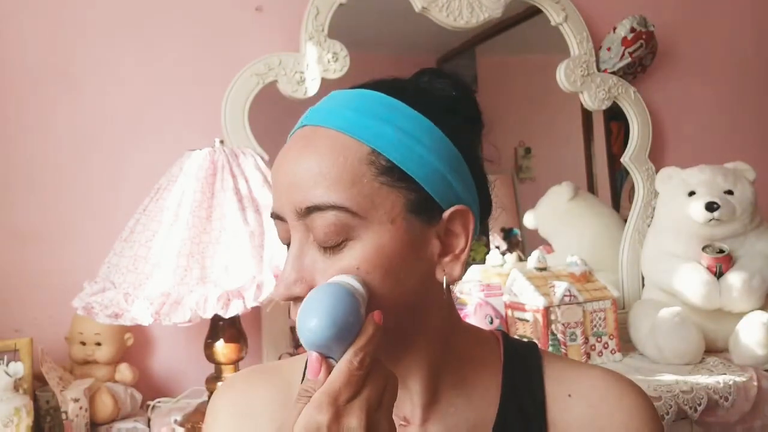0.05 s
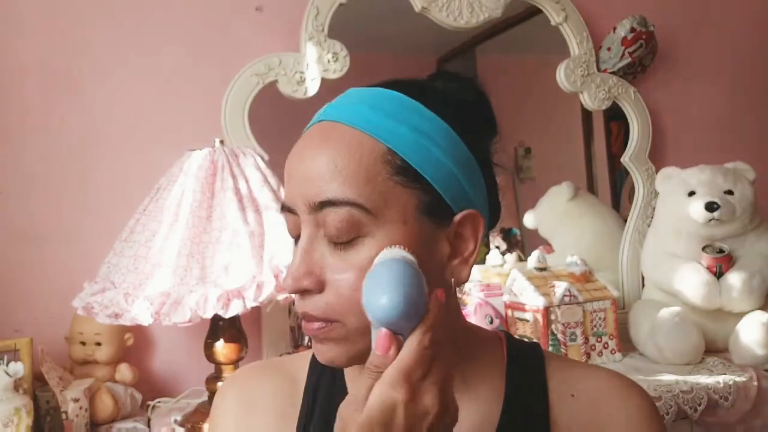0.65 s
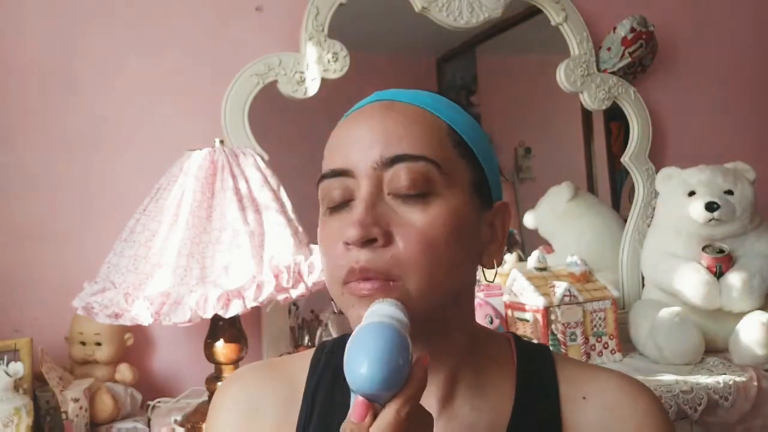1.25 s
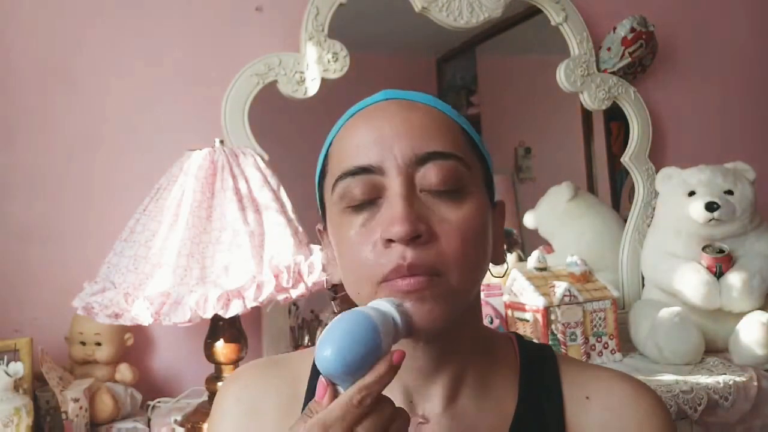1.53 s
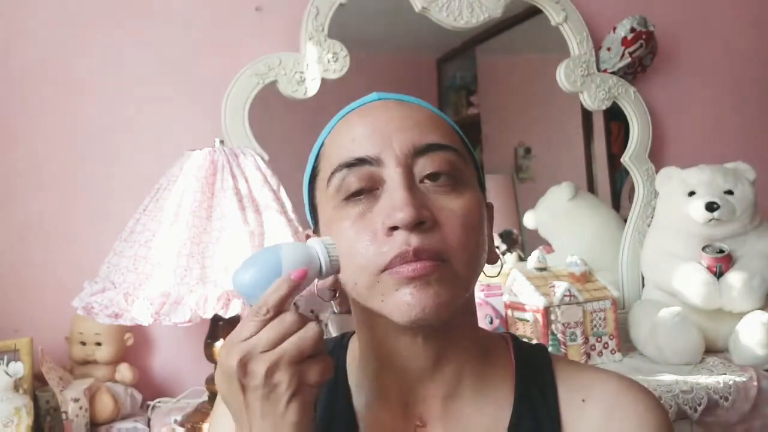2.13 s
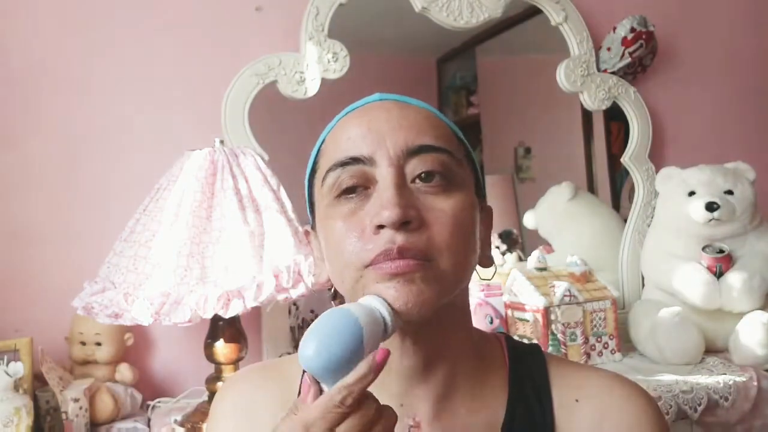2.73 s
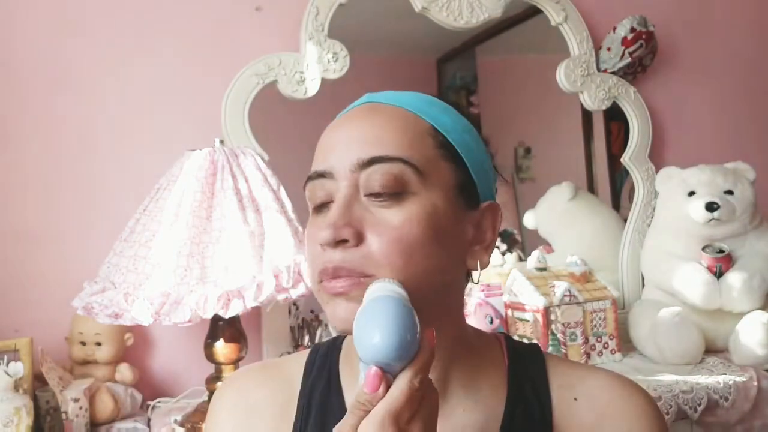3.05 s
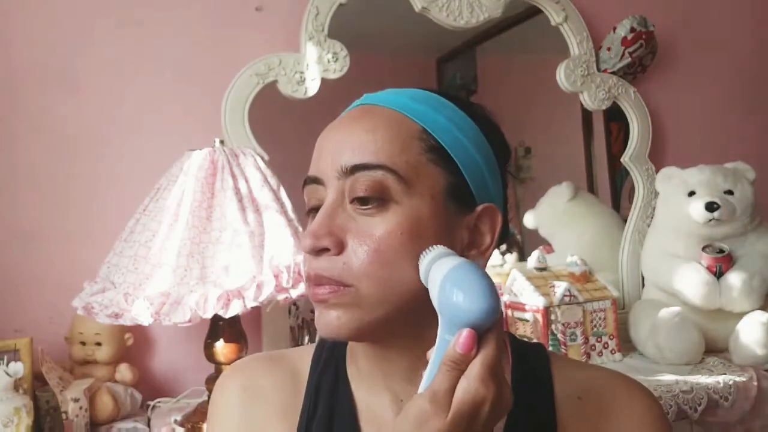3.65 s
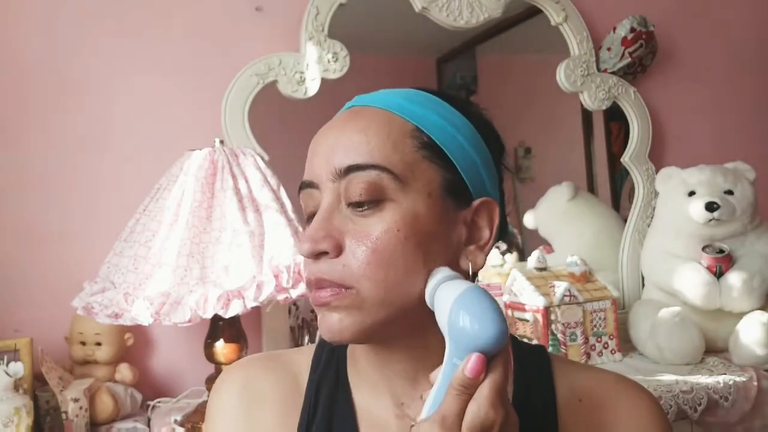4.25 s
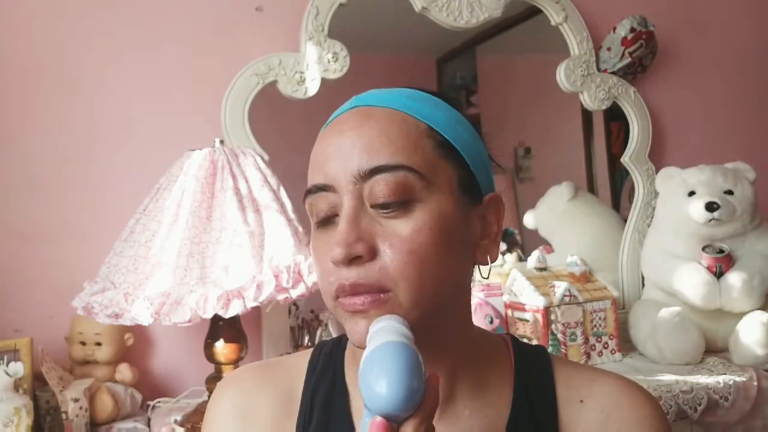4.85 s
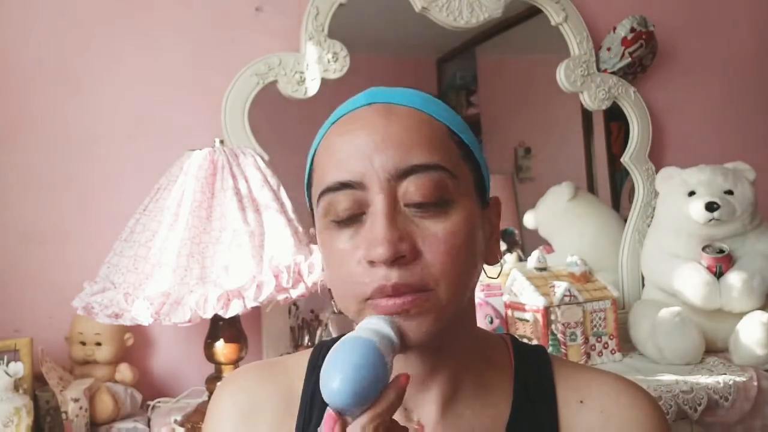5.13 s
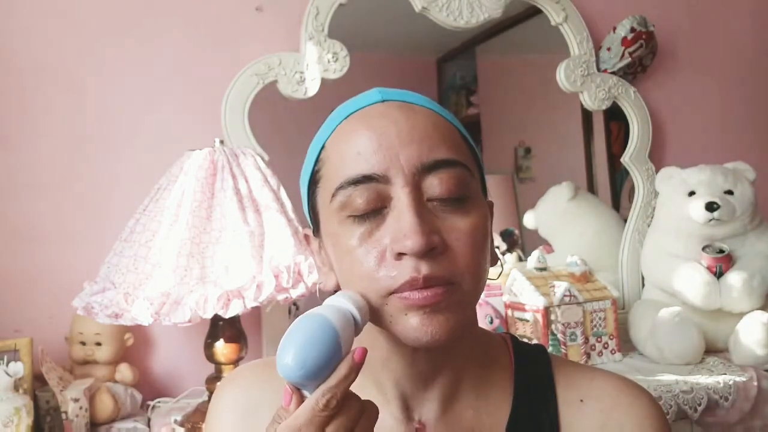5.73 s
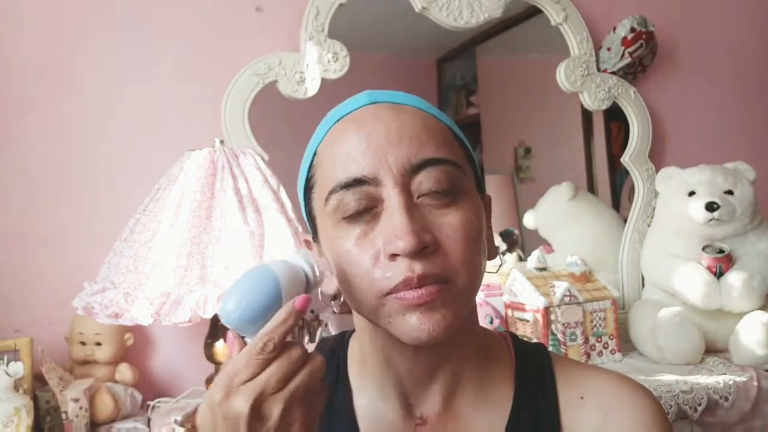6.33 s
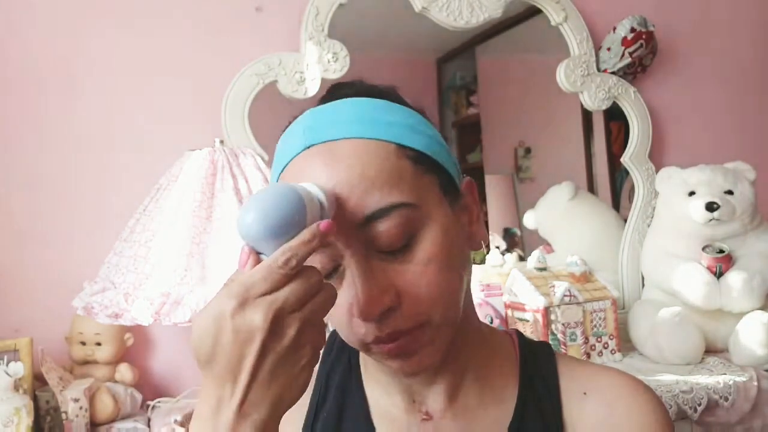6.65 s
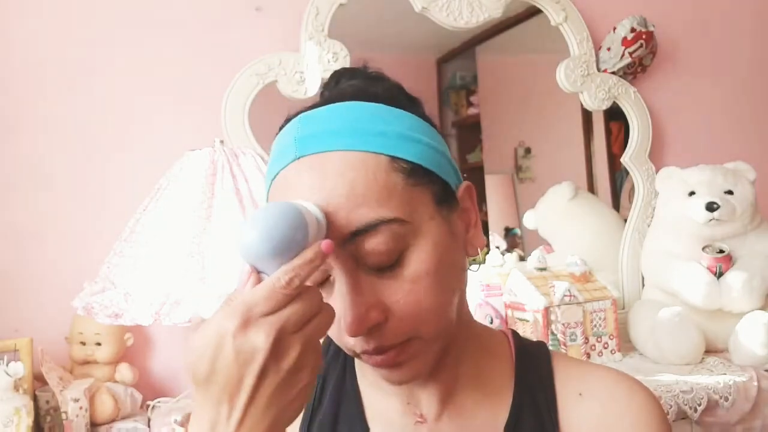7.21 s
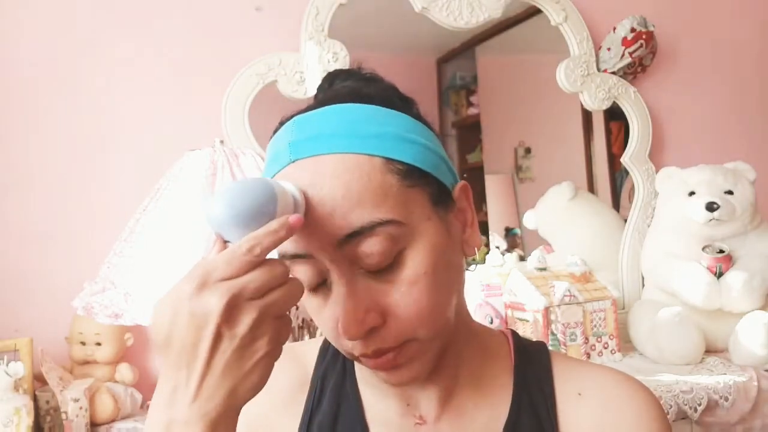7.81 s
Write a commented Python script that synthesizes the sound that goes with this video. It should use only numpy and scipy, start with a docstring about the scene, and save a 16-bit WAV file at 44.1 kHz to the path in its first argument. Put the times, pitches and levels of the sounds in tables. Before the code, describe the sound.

A small battery facial brush buzzes close to the microphone for the whole eight seconds, in a quiet bedroom with a very faint low rumble. The sound is a bright, raspy rattle of plastic gears in a hollow shell, with a whine on top and a soft, dull rub of bristles on skin underneath. Loudness stays fairly even, but the pitch keeps wavering, sinking and softening under pressure, then rising again. It dips deepest around 3.3, 3.6, 5.3, 6.2 and 7.1 seconds and peaks near 1.1, 2.5, 5.8 and 6.7 seconds. Light, short bristle scrapes come at about 0.3, 1.5, 2.6, 3.1, 5.9 and 7.3 seconds. The gears squeal briefly here and there, most clearly between 1 and 1.5 seconds and from 6 to 6.8 seconds. At the end the motor sags to its lowest pitch, still running.

```python
"""A battery facial brush runs against the skin in a small bedroom, close to the microphone.
Its plastic gear teeth meet several hundred times a second: the impacts excite the resonances of the
hollow shell, and harmonics of the mesh rate sound as a whine. Pressing harder loads the motor, so
the whine sinks and the rasp softens. The bristles rub and now and then scrape, binding gears squeal
briefly, and a faint room rumble lies underneath."""
import sys
import numpy as np
from scipy import signal
from scipy.fft import rfft, irfft, next_fast_len
from scipy.io import wavfile
from scipy.ndimage import uniform_filter1d

SR = 44100
rng = np.random.default_rng(int(sys.argv[2]) if len(sys.argv) > 2 else 0)


def generate_wav(signal):
    """Clip the signal to [-1, 1] and save it as 16-bit WAV at the path in sys.argv[1]."""
    frames = np.transpose(np.atleast_2d(signal))
    scaled = np.clip(frames, -1, 1) * 32767
    pcm = np.round(scaled).astype(np.int16)
    wavfile.write(sys.argv[1], SR, pcm)


N = 351918

# Motor speed, sagging with each press on the skin. Each row: time in seconds, mesh rate in Hz.
MESH_RATE = [(0.0, 736.0), (0.2, 830), (0.29, 750), (0.44, 787), (0.52, 664), (0.61, 587.0), (0.75, 835),
             (0.85, 670), (0.95, 617), (1.15, 1020), (1.23, 860), (1.44, 960), (1.55, 880), (1.69, 658),
             (1.91, 840), (2.06, 720), (2.21, 835), (2.36, 634), (2.53, 1080), (2.64, 730), (2.82, 840),
             (3.0, 915), (3.25, 528), (3.41, 737), (3.52, 645), (3.64, 468), (3.89, 866), (4.04, 656),
             (4.24, 824), (4.31, 743), (4.47, 724), (4.53, 856), (4.63, 660), (4.81, 840), (4.97, 750),
             (5.05, 886), (5.27, 520), (5.46, 559.0), (5.66, 896), (5.82, 1120), (5.93, 742.0), (6.03, 633),
             (6.19, 523), (6.43, 1130), (6.57, 970), (6.68, 1260), (6.73, 969.0), (6.85, 970),
             (7.07, 510.0), (7.23, 950), (7.4, 694), (7.51, 660), (7.59, 826), (7.78, 699.0), (7.87, 575),
             (7.98, 430)]
# Errors of the gear wheel. Each row: multiple of its turning rate, modulation depth in dB.
WHEEL_RUNOUT = [(1, -1.26), (3, 0.83), (5, -0.45), (7, 1.3), (9, .5)]
# Rough upper buzz of the gears. Each row: multiple of the mesh rate, relative level in dB.
BUZZ_HARMONICS = [(4, 6), (5, 5.5), (6, 6), (7, 5.5), (8, 4), (9, 4), (10, -2.5), (11, 1), (12, -2),
                  (13, -7.5)]
# Broad response of the shell. Each row: frequency in Hz, gain in dB.
SHELL_RESPONSE = [(150, -28), (350, -25), (700, -20.5), (1000, -14), (1300, -11), (1600, -6), (2100, -2.5),
                  (2800, -1), (3700, 3), (5200, 7), (7700, 3), (10800, -8.5), (12800, -9), (15000, -17)]
# Narrow resonances on that response. Each row: frequency in Hz, width in Hz, lift in dB.
SHELL_PEAKS = [(2020, 70, 2), (2205, 90, 4.5), (2375, 100, 4.5), (3030, 70, 2), (3640, 60, 2.5),
               (3830, 100, 3), (4490, 130, 3), (5560, 200, 2.2), (6140, 110, 2.8), (6780, 60, 2),
               (7020, 120, 2), (9250, 350, 3), (10100, 160, 3), (11850, 600, 2.5)]
# Loudness rises with speed, then levels off while the top keeps growing.
# Each row: mesh rate in Hz, then base levels of growl, rasp and sizzle in dB.
LEVELS_BY_SPEED = [(490, -56.5, -52.5, -63.5), (581, -53, -49.5, -56.5), (692, -54, -45, -51),
                   (823, -52, -43, -47), (1150, -53.5, -42.5, -44.5)]
# The brush is louder or softer as it is moved and turned. Each row: time in seconds, gain in dB.
TURNING_GAIN = [(0.0, 1.2), (0.54, 0.7), (0.72, -0.7), (0.9, 1.9), (1.02, 0), (1.5, 0.6), (1.74, -0.5),
                (1.98, 0.5), (2.52, -0.7), (2.88, 0.26), (3.78, 0), (5.94, -0.04), (6.36, -1.3), (6.72, 0),
                (7.08, 0.7), (7.2, -2), (7.26, 0.4), (7.98, -2)]
# Clear gear tones. Each entry: relative level in dB, for harmonics 1 to 5 of the mesh rate.
WHINE_HARMONICS_DB = [-1.5, -0.5, -4, -10, -6]
# The shell's response to a gliding tone. Each row: frequency in Hz, base level in dB over the rasp.
WHINE_RESPONSE = [(470, -30), (740, -35.5), (850, -26), (950, -24.5), (1050, -23.5), (1300, -16.5),
                  (1600, -16), (1750, -13), (1950, -7), (2250, -4), (2450, -9.5), (2800, -10.5),
                  (3250, -7.5), (3550, -29), (5000, -22)]
# Slow swings of the two main tones. Each row: time in seconds, gains of harmonics 2 and 3 in dB.
WHINE_SWINGS = [(0, 2, 4), (.25, 2, -3), (.8, 2, -1.5), (1.15, -1.5, 2), (1.7, -5, 1), (2.4, -6, 3),
                (2.7, -1.5, 1.5), (3.3, 1, -1), (3.7, -3.5, 3.5), (4.05, 3, 3), (4.62, 2, 2.5),
                (5.05, -1.5, 6), (5.3, -3, -2.5), (5.95, -2.5, 5), (6.45, -0.5, -2), (6.9, -2.5, -2),
                (7.45, 0.5, 1), (7.98, -2, 0.5)]
# How freely the hand lets the shell ring.
# Each row: time in seconds, then base levels of the low, middle and high modes in dB over the rasp.
GRIP_LEVELS = [(0.0, -25, -12, -15), (0.18, -5.5, -6.5, -13.9), (0.3, -18, -9, -12),
               (0.96, -5.5, -7.5, -23), (1.38, -11, -11, -16), (1.92, -7.5, -11, -17), (1.98, -10, -7, -26),
               (2.64, -7.5, -11, -15), (3.24, -7.5, -7.5, -21), (3.6, -7, -10, -16), (4.08, -9, -12.8, -22),
               (4.86, -5, -9, -18), (5.34, -10, -14, -14), (6.36, -8.5, -10, -24.5),
               (6.84, -12.5, -16, -10), (7.02, -16, -16.2, -16.7), (7.2, -11, -13.2, -10),
               (7.98, -11, -15.4, -19)]
# Dull rub of bristles on skin. Each row: frequency in Hz, relative spectral level in dB.
RUB_SPECTRUM = [(30, -1), (70, 0.5), (150, 2), (300, -1), (600, 2.5), (1000, -2.5), (2000, -27),
                (6000, -39)]
# Room background. Each row: frequency in Hz, relative spectral level in dB.
ROOM_SPECTRUM = [(20, -8), (40, 1), (65, 4), (90, 4.5), (118, 9.5), (160, 2.5), (220, -6.5), (400, -2.5),
                 (700, -4.5), (1500, -53), (5000, -49), (15000, -27)]
# Dragging bristles. Each row: centre and length in seconds, frequency in Hz, peak in dB over the rasp.
BRISTLE_SCRAPES = [(.3, 0.43, 5400, -9), (1.495, 0.15, 6100, -5), (1.982, 0.082, 4750, -9),
                   (2.59, .07, 3840, -5.5), (3.122, .13, 4470, -6), (4.296, 0.15, 4350, -11),
                   (5.865, 0.068, 3907, -3), (5.869, 0.064, 6010, -6), (6.061, 0.21, 4560, -9),
                   (6.289, 0.042, 3070, -6), (6.721, .07, 5900, -8), (6.92, .08, 4400, -10),
                   (7.34, .11, 4358, -8)]
# Binding gears. Each row: centre and length in seconds, multiple of the mesh rate, lift in dB.
GEAR_SQUEALS = [(0.29, 0.076, 3, 10.5), (0.946, .1, 2, 6), (1.125, 0.14, 1, 14), (1.39, .15, 1, 11.5),
                (1.62, 0.073, 3, 8), (1.825, .08, 3, 7.5), (2.499, .15, 1, 11.5), (2.67, 0.11, 3, 5.5),
                (3.922, 0.12, 2, 4.5), (3.971, 0.047, 3, 1.5), (4.271, 0.19, 2, 2), (4.37, .16, 3, 5.5),
                (5.11, 0.082, 3, 5.5), (5.36, 0.34, 4, 6), (5.42, 0.19, 5, 7), (6.09, .2, 4, 15.5),
                (6.113, 0.12, 5, 12.5), (6.471, .14, 1, 13), (6.661, 0.14, 1, 19), (6.783, .15, 2, 8)]
# The sound leans slightly left near 2 kHz and slightly right near 9.5 kHz.
# Each row: frequency in Hz, width in Hz, share added on the left and taken from the right.
STEREO_TILT_BANDS = [(1980, 280, 0.31), (9500, 440, -0.31)]


def from_db(db):
    """Amplitude ratio: a factor of ten for every 20 dB."""
    return 10 ** (np.asarray(db) / 20)


def unit_rms(x):
    """Normalisation to a mean power of one."""
    return x / np.sqrt(np.mean(x ** 2) + 1e-20)


def levelled(x):
    """Division by the running RMS holds the short-term power near one."""
    power = uniform_filter1d(uniform_filter1d(x * x, size=2200), size=2200)
    return x / np.sqrt(power + 1e-20)


def in_time(rows):
    """Linear interpolation in time gives each column one value per sample."""
    times, *columns = np.transpose(rows)
    return [np.interp(np.arange(N) / SR, times, column) for column in columns]


def at_hz(rows, hz):
    """Interpolation of each column on a logarithmic frequency axis."""
    freqs, *columns = np.transpose(rows)
    return [np.interp(np.log(np.maximum(hz, 1)), np.log(freqs), column) for column in columns]


def drift(rate_hz):
    """Low-passed noise gives a smooth random fluctuation with a spread of about one."""
    pole = np.exp(-2 * np.pi * rate_hz * 20 / SR)
    noise = rng.standard_normal((N + SR) // 20 + 2)  # one draw per 20 samples
    slow = signal.lfilter([1], [1, -2 * pole, pole * pole], noise)[SR // 20:]
    return np.interp(np.arange(N) / 20, np.arange(len(slow)), unit_rms(slow))


def swell(centre_s, length_s):
    """A Gaussian envelope of height one, its length taken between the 1/e points."""
    return np.exp(-np.minimum((2 * (np.arange(N) / SR - centre_s) / length_s) ** 2, 20))


def coloured(x, spectrum, peaks=()):
    """Spectral shaping by a broad response with bell-shaped resonant lifts."""
    size = next_fast_len(N + SR // 10)
    hz = np.arange(size // 2 + 1) * SR / size
    lift_db = sum(db / (1 + (2 * (hz - centre) / width) ** 2) for centre, width, db in peaks)
    return irfft(rfft(x, size) * from_db(at_hz(spectrum, hz)[0] + lift_db), size)[:N]


def split(x, hz):
    """A complementary crossover: the parts below and above a frequency sum to the whole."""
    low = signal.sosfiltfilt(signal.butter(5, hz, "low", fs=SR, output="sos"), x)
    return low, x - low


def resonance(x, hz, width_hz):
    """Forced vibration of two damped resonators in series, each of the given bandwidth."""
    radius = np.exp(-np.pi * width_hz / SR)
    poles = [1, -2 * radius * np.cos(2 * np.pi * hz / SR), radius * radius]
    once = signal.lfilter([1, 0, -1], poles, x)
    return signal.lfilter([1, 0, -1], poles, once)


def motor(inertia_s=.05, usual_hz=780, braking_octaves_per_s=6.4):
    """Rotor inertia rounds each change of speed; drag runs from -1 (racing up) to 1 (braked by skin)."""
    mesh_hz = uniform_filter1d(in_time(MESH_RATE)[0], size=int(inertia_s * SR), mode="nearest")
    octaves = np.log2(mesh_hz / usual_hz)
    drag = np.tanh(-np.gradient(octaves) * SR / braking_octaves_per_s)
    return mesh_hz, octaves, drag


def runout(teeth, wheel_teeth=54):
    """Amplitude modulation: a wheel out of true bites harder at the same places on each turn."""
    turns = teeth / wheel_teeth
    bite_db = sum(db * np.sin(2 * np.pi * (k * turns + rng.random())) for k, db in WHEEL_RUNOUT)
    return from_db(bite_db + 0.16 * drift(48))


def tooth_clicks(teeth, jitter_s=.00004, uneven_db=1.0, slide_db=8, slide_decay_teeth=.85):
    """Impact and sliding friction: each tooth lands early or late, on either flank, then scrapes."""
    contacts = np.flatnonzero(np.diff(np.floor(teeth)) > 0)
    late, force, flank = rng.standard_normal((len(contacts), 3)).T
    landings = np.clip(contacts + jitter_s * SR * late, 0, N - 2).astype(int)
    strength = from_db(uneven_db * np.clip(force, -2, 2))
    clicks = np.bincount(landings, strength * np.sign(flank), N)
    last_tooth = np.maximum(np.searchsorted(contacts, np.arange(N)) - 1, 0)
    sliding = np.exp(-(teeth % 1) / slide_decay_teeth) * strength[last_tooth] * rng.standard_normal(N)
    return unit_rms(unit_rms(clicks) + from_db(slide_db) * unit_rms(sliding))


def bristle_flicks(per_s=5000, spread_db=2.8):
    """Stick-slip friction: bristle tips catch on the skin and flick free as random impulses."""
    flicks = (rng.random(N) < per_s / SR) * rng.choice([-1, 1], N)
    strength = from_db(spread_db * np.minimum(rng.exponential(1, N), 4))
    return unit_rms(flicks * strength)


def face_reflections(x, lag_s=.0017, sway=.12, share=.2):
    """Comb filtering: echoes from cheek and hand shift in delay as the brush moves."""
    n = np.arange(N)
    lags = [k * lag_s * SR * (1 + sway * drift(0.464)) for k in (1, 1.7, 2.9)]
    return x + share * sum(np.interp(n - lag, n, x) for lag in lags)


def bedroom(x, t60_s, wet_db):
    """Reverberation: direct sound plus a diffuse tail whose paths change as brush and head move."""
    t = np.arange(SR // 4) / SR
    tails = rng.standard_normal((6, len(t))) * from_db(-60 * t / t60_s) * (t > .002)
    weights = np.array([drift(1.07) for _ in tails])
    weights = weights / np.linalg.norm(weights, axis=0)
    echoes = [signal.oaconvolve(x, tail / np.linalg.norm(tail))[:N] for tail in tails]
    return x + from_db(wet_db) * np.sum(weights * echoes, axis=0)


def gear_buzz(teeth, swell_db=2.2, slip_rad=.5):
    """Phase modulation: play in the gears blurs the upper harmonics of the mesh rate."""
    loose_teeth = teeth + .075 * drift(34)
    buzz = 0
    for k, db in BUZZ_HARMONICS:
        gain = from_db(db + swell_db * drift(12))
        path_cycles = .5 * rng.random()  # the gear train delays each harmonic differently
        buzz += gain * np.sin(2 * np.pi * (k * loose_teeth + path_cycles) + slip_rad * drift(80))
    return unit_rms(buzz)


def shell_radiation(shake, mesh_hz, growl_db, rasp_db, sizzle_db):
    """Source and filter: the shaken shell radiates a low growl, a middle rasp and a high sizzle."""
    low, high = split(coloured(shake, SHELL_RESPONSE, SHELL_PEAKS), 2850)
    bass, low_middle = split(low, 1600)
    middle, top = split(high, 8830)
    labour = np.clip(1 - mesh_hz / 700, 0, 1)  # a labouring motor loses the bottom of its growl
    growl = from_db(growl_db + 0.3 * drift(2.5)) * levelled(low_middle + from_db(-22 * labour) * bass)
    rasp = from_db(rasp_db - 0.1 + 0.82 * drift(8.1)) * levelled(middle)
    grab_db = 1.3 * drift(45)  # bristles grab and let go, so the top flickers
    sizzle = from_db(sizzle_db - 1.6 + grab_db) * levelled(top)
    return growl + rasp + sizzle


def gear_whine(teeth, mesh_hz, rasp_db, drag, flutter_db=2.0, slip_rad=0.53, free_run_hz=818.2):
    """Periodic meshing gives harmonic tones, loudest where the shell's response favours their pitch."""
    # teeth held together by a growing load sing; racing or running free, they only rattle
    load_db = 3 * drag - 19 * np.maximum(np.log2(mesh_hz / free_run_hz), 0)
    swing_db = dict(zip((2, 3), in_time(WHINE_SWINGS)))
    whine = 0
    for k, harmonic_db in enumerate(WHINE_HARMONICS_DB, 1):
        db = rasp_db + load_db + harmonic_db + at_hz(WHINE_RESPONSE, k * mesh_hz)[0]
        db += swing_db.get(k, 0) + squeal_db(k) + 1.5 * drift(12.3)
        flutter = from_db(flutter_db * drift(26))
        tone = flutter * np.sin(2 * np.pi * k * teeth + slip_rad * drift(45))
        whine += from_db(db) * levelled(bedroom(tone, t60_s=0.14, wet_db=-2.5))
    return whine


def shell_modes(shake, octaves, low_db, middle_db, high_db):
    """Resonance: each of three modes adds only the power by which it exceeds the rasp around it."""
    def mode(db, hz, width_hz, floor_db):
        excess_power = np.maximum(from_db(db) ** 2 - from_db(floor_db) ** 2, 0)
        return np.sqrt(excess_power) * levelled(resonance(shake, hz, width_hz))

    low = mode(low_db + 1.5 * drift(9.3) - 0.3, hz=3256, width_hz=270, floor_db=-11.5)
    # faster teeth strike the higher modes harder
    middle = mode(middle_db + 3 * octaves + drift(8) + 0.24, hz=8260, width_hz=590, floor_db=-10.5)
    high = mode(high_db + 6 * octaves - 0.5, hz=11860, width_hz=730, floor_db=-18)
    return low + middle + high


def skin_rub():
    """Friction of bristles on skin gives a dull broadband noise."""
    return unit_rms(coloured(rng.standard_normal(N), RUB_SPECTRUM))


def room_rumble():
    """Ambient noise with its power mostly at low frequencies."""
    return unit_rms(coloured(rng.standard_normal(N), ROOM_SPECTRUM))


def scrapes(rattle, width_hz=1050):
    """Forced vibration: dragging bristles briefly drive one band of the shell harder."""
    return sum(from_db(db) * swell(centre_s, length_s) * unit_rms(resonance(rattle, hz, width_hz))
               for centre_s, length_s, hz, db in BRISTLE_SCRAPES)


def squeal_db(harmonic):
    """Friction in binding gears briefly lifts one harmonic of the whine."""
    return sum(db * swell(centre_s, length_s)
               for centre_s, length_s, k, db in GEAR_SQUEALS if k == harmonic)


def facial_brush():
    """Structure-borne sound: gears and bristles shake the shell; speed sets level and brightness."""
    mesh_hz, octaves, drag = motor()
    growl_db, rasp_db, sizzle_db = at_hz(LEVELS_BY_SPEED, mesh_hz) + in_time(TURNING_GAIN)[0]
    low_db, middle_db, high_db = in_time(GRIP_LEVELS)
    sizzle_db += 0.22 * (high_db + 14.5)  # a freer shell lets out more sizzle
    # teeth roll more smoothly under load, so the buzz gains on the loose rattle
    buzz_db = -7.5 - 2.5 * octaves + 2 * drag + 0.5 * drift(3.6)
    # running count of teeth met; backlash makes the speed tremble
    teeth = np.cumsum(mesh_hz * (1 + .014 * drift(80))) / SR
    bite = runout(teeth)
    impacts = unit_rms(bite * tooth_clicks(teeth) + from_db(-7) * bristle_flicks())
    rattle = unit_rms(bedroom(face_reflections(impacts), t60_s=.22, wet_db=-4))
    buzz = unit_rms(bedroom(bite * gear_buzz(teeth), t60_s=.2, wet_db=-3))
    shake = rattle + from_db(buzz_db) * buzz
    shell = shell_radiation(shake, mesh_hz, growl_db, rasp_db + 1.04 * drag, sizzle_db)
    whine = gear_whine(teeth, mesh_hz, rasp_db, drag)
    ringing = shell_modes(shake, octaves, low_db, middle_db, high_db)
    rub = from_db(-21.5) * skin_rub()
    return shell + whine + from_db(rasp_db) * (ringing + rub + scrapes(rattle))


def scene():
    """Superposition: the brush sits in the middle over a faint, slightly wide room rumble."""
    room_mid = from_db(-74 + drift(3.9)) * room_rumble()
    room_side = from_db(-90) * room_rumble()
    return facial_brush() + room_mid + room_side * np.array([[1], [-1]])


def record(dry):
    """Mid-side stereo: one narrow band leans left and another right; a steep low-pass cuts the top."""
    mid = dry.mean(axis=0)
    side = 0
    for hz, width, share in STEREO_TILT_BANDS:
        band = signal.butter(2, [hz - width / 2, hz + width / 2], "band", fs=SR, output="sos")
        side += share * signal.sosfilt(band, mid)
    low_pass = signal.ellip(12, .1, 70, 15720, fs=SR, output="sos")
    return signal.sosfilt(low_pass, dry + side * np.array([[1], [-1]]))


dry = scene()
out = record(dry)
generate_wav(out)
```